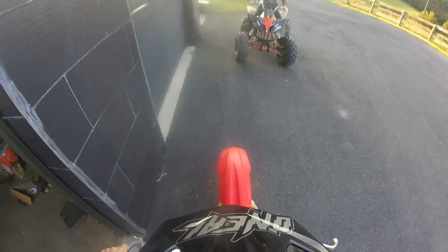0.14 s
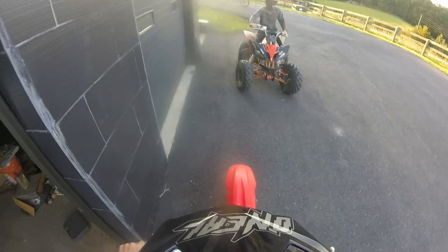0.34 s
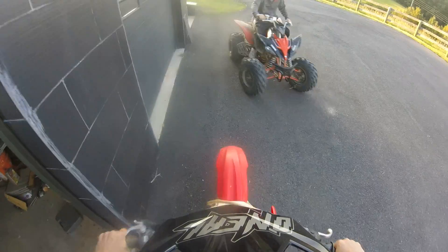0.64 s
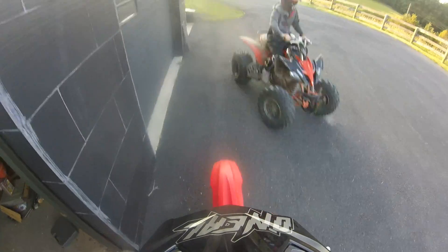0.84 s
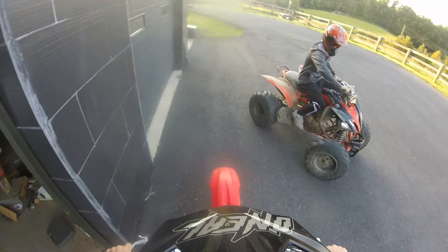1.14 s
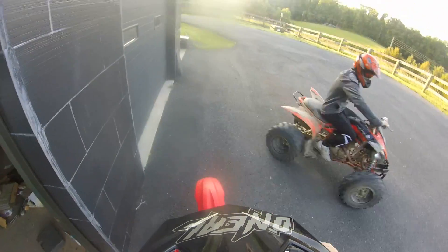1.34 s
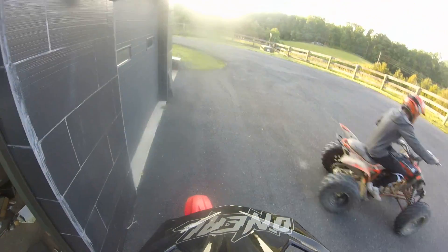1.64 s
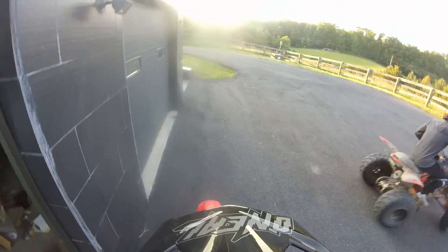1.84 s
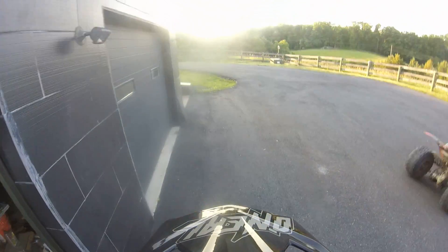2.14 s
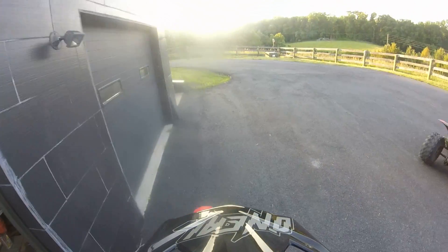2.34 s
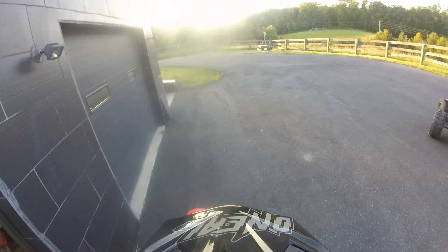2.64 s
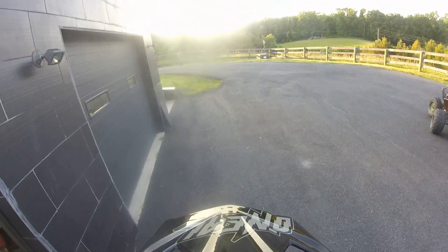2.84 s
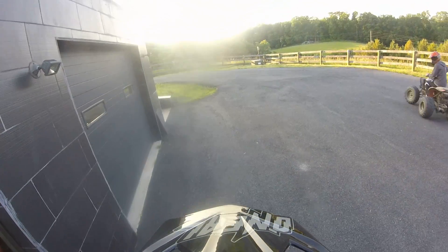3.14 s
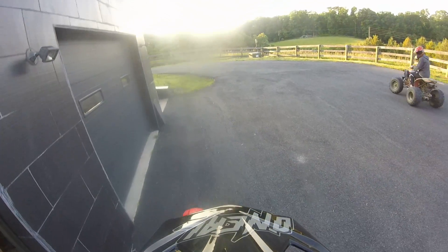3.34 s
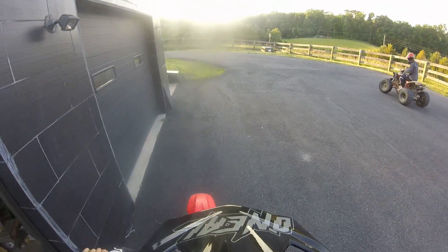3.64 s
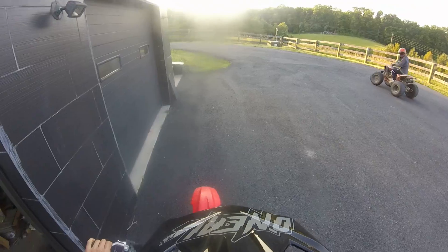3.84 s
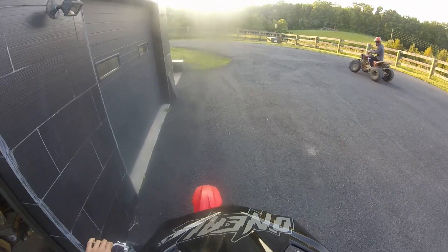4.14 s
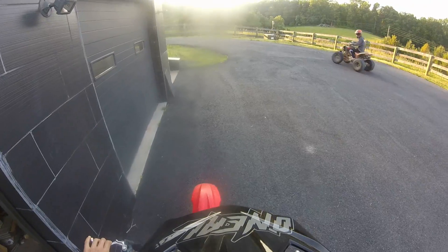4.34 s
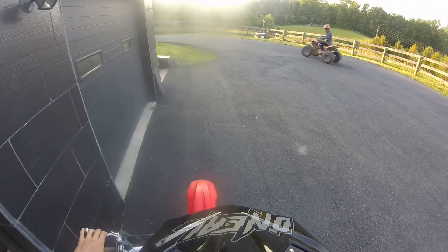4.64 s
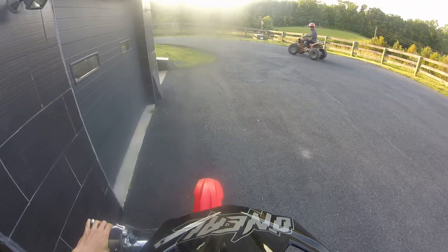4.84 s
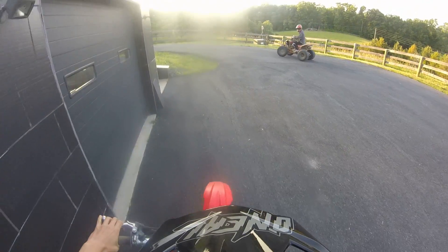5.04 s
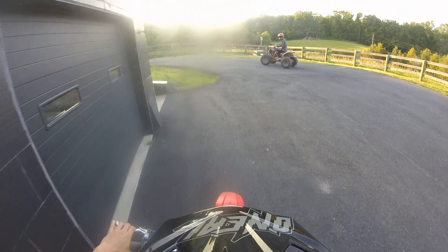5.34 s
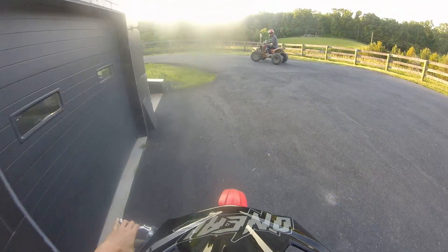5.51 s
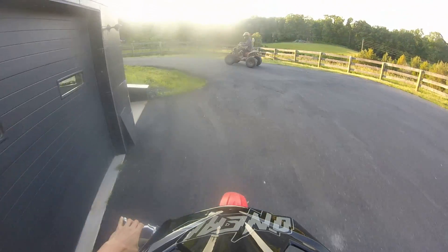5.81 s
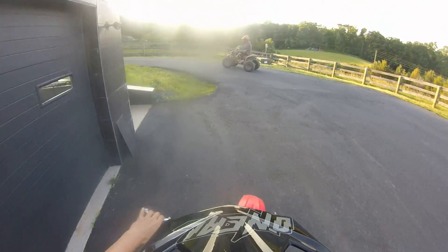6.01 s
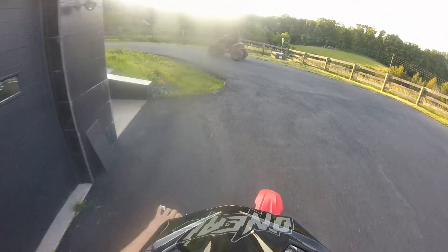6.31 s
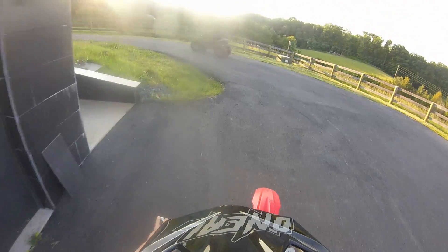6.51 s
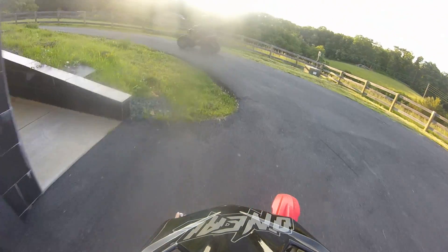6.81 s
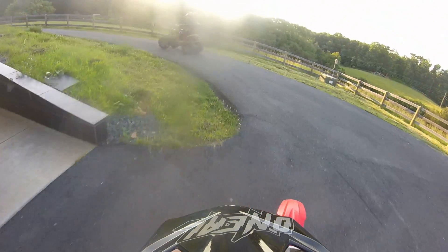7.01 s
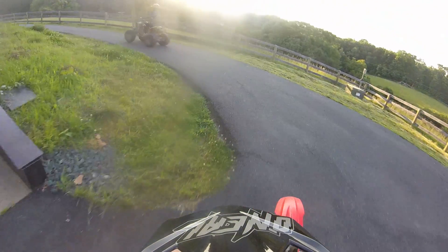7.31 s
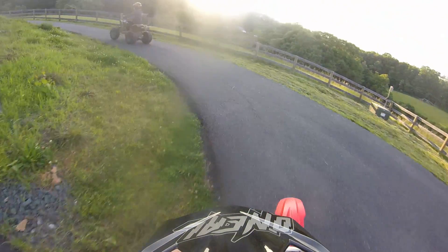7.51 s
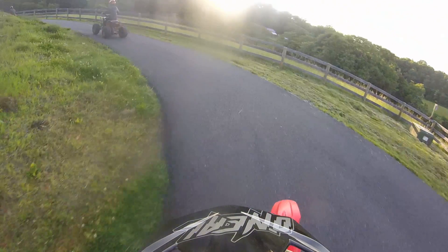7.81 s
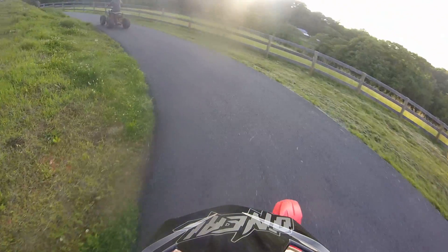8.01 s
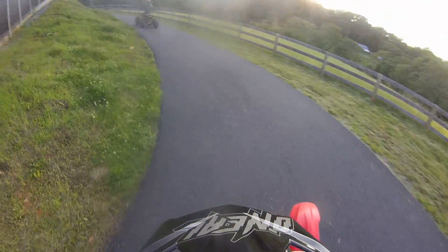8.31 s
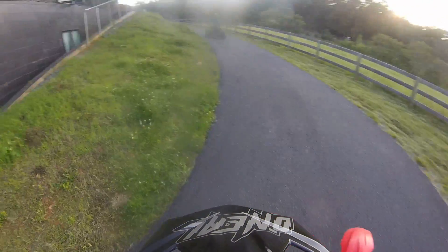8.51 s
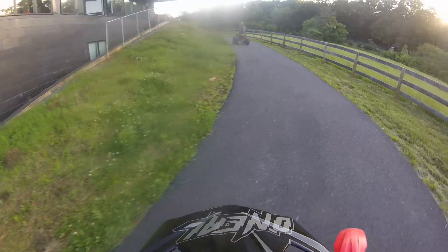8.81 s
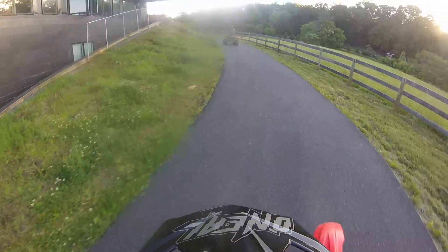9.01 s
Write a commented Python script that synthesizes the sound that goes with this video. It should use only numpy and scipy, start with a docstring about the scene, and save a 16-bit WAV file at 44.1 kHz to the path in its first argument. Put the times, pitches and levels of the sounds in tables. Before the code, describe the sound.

A muffled quad putters past while a dirt bike's kick lever clanks close by. The single-cylinder engine catches and gets two double blips of throttle, with a few sharp pops. The bike then pulls away along a paved lane, thudding and clattering, echoing slightly off a garage wall. Near the end the chain ticks as the throttle closes and gently reopens. Heard from the rider's helmet, with a low wind rumble.

```python
"""First a quad putters past while a single-cylinder dirt bike is kick-started beside a garage wall. At 1 s the
engine catches, and the rider gives two double blips of throttle. Each firing thuds in the pipe and honks in the
air intake; valve and piston blows ring a camera case on the helmet. From 3.3 s the bike pulls away along a
paved lane in a low wind, its piston slapping at low speed. Near the end the chain ticks, and the rider rolls
off the throttle and picks up again."""
import sys
import numpy as np
from scipy import signal
from scipy.io import wavfile

SR = 44100
rng = np.random.default_rng(int(sys.argv[2]) if len(sys.argv) > 2 else 0)


def generate_wav(signal):
    """Clip the signal to [-1, 1] and save it as 16-bit WAV at the path in sys.argv[1]."""
    frames = np.transpose(np.atleast_2d(signal))
    scaled = np.clip(frames, -1, 1) * 32767
    pcm = np.round(scaled).astype(np.int16)
    wavfile.write(sys.argv[1], SR, pcm)


N = 403956
TIME = np.arange(N) / SR
BINS = np.fft.rfftfreq(8192, 1 / SR)  # the frequencies (Hz) at which filter gains are given

# air buffeting the helmet: t/s, level/dB
WIND_LEVELS = [(0, -58.5), (3, -43), (5, -38), (7, -44), (9.16, -43.5)]
# the tone of that wind: f/Hz, level/dB
WIND_TONE = [(8, 2.5), (20, -9.5), (60, -35), (150, -16.5), (400, -16), (1000, -23.5), (4000, -66)]
# the quad's engine speed: t/s, firing rate/Hz
QUAD_SPEED = [(0, 51), (.15, 37), (.3, 51), (.5, 44.6), (.62, 46), (.75, 53.5), (.9, 50), (1.6, 58),
              (2, 44.5), (3.3, 46.7)]
# the quad's loudness: t/s, exhaust level/dB, machine noise level/dB
QUAD_LEVELS = [(0, -51, -45.5), (.2, -40.5, -44), (.5, -45.5, -43.5), (.68, -40, -42.5), (.85, -40.5, -43),
               (1.2, -43, -35), (1.7, -35.5, -38.5), (2.1, -59, -40), (3.3, -50.5, -44), (9.16, -78, -46)]
# the tone of its machine noise, before a bass cut: f/Hz, level/dB
QUAD_TONE = [(35, -42), (60, 4.5), (110, -1.5), (150, -19), (339, -26), (480, -45.5), (982, -41),
             (1490, -24.5), (2060, -48), (2420, -30), (2910, -31), (4510, -48.5), (4950, -53.5),
             (8230, -51.5), (15000, -76)]
# its squeaks on dabs of throttle: t/s, length/s, f/Hz, level/dB
QUAD_SQUEAKS = [(.23, .06, 4500, -59), (.665, .06, 4600, -56)]
# kick lever and footwork: t/s, peak level/dB, time to fade by 60 dB/s, treble tilt/(dB per octave)
KICKS = [(0.081, -37, 0.065, -1), (.241, -26.5, 0.13, -3), (0.314, -32, 0.074, -4),
         (.333, -19.5, 0.13, -0.5), (0.456, -29, 0.13, 0.5), (0.883, -33, 0.051, -2),
         (.907, -23.5, 0.049, -6.5), (.991, -16.5, 0.088, -2.5), (2.963, -25.5, 0.26, 2.5)]
# the tone of those metal knocks: f/Hz, level/dB
KICK_TONE = [(180, -67), (300, -11), (577, -15.5), (1010, -14), (1210, -7), (1590, 0.5), (2040, -14.5),
             (3020, 6), (3330, -10), (3860, -7), (4470, -36), (6000, -10.5), (6950, -23.5), (10600, -23),
             (15000, -51)]
# sharp pops as the fuel mixture catches: t/s, peak level/dB
FUEL_POPS = [(1.314, -23), (1.321, -10), (2.44, -14), (2.445, -12.5), (2.662, -14), (2.68, -11.5),
             (2.695, -11)]
# the helmet jolts with the kicks: t/s, level/dB, f/Hz, length/s
HELMET_JOLTS = [(0.271, -27.5, 16.3, 0.047), (0.368, -25.5, 16.2, 0.072), (0.479, -34, 13.4, 0.13),
                (0.92, -23, 19.6, 0.0632)]
# the chain ticks on its guide: t/s, tick rate/Hz, level/dB
CHAIN_TICKS = [(6.7, 39, -70), (7.05, 27, -52.5), (7.45, 37.5, -50.5), (7.92, 45, -57), (8.01, 54, -50.5),
               (8.1, 46, -64), (8.3, 45, -57.5), (8.6, 50, -89)]
# the garage wall throws the engine back: t/s, echo level/dB
WALL_ECHO = [(1, -5.5), (3, -9), (4.7, -7.5), (5.65, -3.5), (6.5, -6), (7.3, -9)]

# Modes are the pitches at which a part likes to ring. All of these list: f/Hz, width/Hz, level/dB
CHAIN_MODES = [(3880, 420, 13), (6060, 840, 2), (6960, 600, 1), (8370, 810, 1.5), (10013, 1420, -10),
               (11544, 1000, -10), (14610, 1600, -19.5)]
CASE_HIGH_MODES = [(2419, 128, 6), (2698, 48, 12.5), (2758, 160, 2.5), (2977, 340, 1), (2980, 230, -8.5),
                   (3816, 230, -10.5)]  # the camera case's higher, narrower notes
CASE_MODES = [(1380.4, 146, 14), (1529, 205, 14.5), (1893, 210, 0.5), (1170, 1200, -7.5)]  # the camera case
SLAP_MODES = [(1561, 137, -0.5), (1456, 120, 1)]  # the engine, struck by its piston
AIRBOX_MODES = [(229.2, 40, -5), (303, 50, -6.5), (164, 110, -22.5)]  # the box the engine breathes through
BOOM_MODES = [(52.6, 20, 0), (91.2, 30, 6), (133.4, 39, 0)]  # the pipe's deepest notes; each is rescaled, so its level here cancels
PULL_BODY_MODES = [(194, 22, 14.5), (228, 42, 4.5), (290, 64, 13), (375.5, 96, -27)]  # the pipe's middle notes under load
PULL_BARK_MODES = [(485.5, 100, 4), (689, 128, 1.5), (872, 76, -3)]  # its upper notes under load, at 50 firings a second
COAST_BODY_MODES = [(182, 23, 13), (221, 106, 8), (256, 66, -20), (359, 67, -3)]  # its middle notes when coasting
COAST_BARK_MODES = [(450, 210, 8.5), (611, 160, 0.5), (698, 230, 2.5), (900, 130, -5.5)]  # its upper notes when coasting

# the tone of the engine's rasp and of its higher sizzle: f/Hz, level/dB
RASP_TONE = [(1180, -19), (2000, -2), (2050, -8), (2210, 2), (2660, 6), (2880, -1.5), (3080, -5.5),
             (3570, -5.5), (3870, -10), (4530, -25.5), (5000, -33.5), (6500, -46), (11000, -120)]
SIZZLE_TONE = [(2820, -51), (4800, -9), (5260, -11.5), (5730, -2), (6020, 0), (6590, -8.5), (7260, -12.5),
               (8420, -12), (9400, -18), (11500, -24.5), (12900, -30), (14100, -31), (15100, -36)]
# valve and piston blows: delay after firing/cycles, coasting level/dB, loaded level/dB
VALVE_BLOWS = [(.06, -1.5, -6), (.33, -8, -10), (.64, -3.5, -8.5), (0.801, -3, -3.5)]
# throttle blips in neutral: t/s, held/s, top firing rate/Hz, extra exhaust/dB, extra clatter/dB,
# extra rasp/dB, share of intake honk/(0-1)
THROTTLE_BLIPS = [(.985, 0.093, 52.5, 12.5, 5, 8, 0.72), (1.215, 0.094, 69.5, 14, 12.5, 5.5, 0.57),
                  (2.335, .125, 42, 11, 4, 6.5, 0.7), (2.61, 0.089, 69, 13, 6, 4, 1)]
# misfires dip the exhaust: t/s, length/s, level change/dB
MISFIRE_DIPS = [(1.193, 0.015, -4), (2.296, 0.045, -20), (3.688, 0.017, -15), (3.875, 0.023, -18),
                (4.938, 0.014, -7)]
# the bike's engine speed in gear: t/s, firing rate/Hz
RIDE_SPEED = [(3.3, 37.69), (3.4, 35.4), (3.56, 43.5), (4.0, 43.93), (4.13, 48.82), (4.25, 50.79),
              (4.79, 46.64), (4.93, 47.83), (5.49, 47.13), (6.1, 56.82), (6.18, 54.8), (6.5, 55.53),
              (6.92, 51.47), (7.31, 52.89), (7.79, 48.67), (7.85, 45.94), (8.21, 39.38), (8.31, 42.46),
              (8.46, 41.0), (8.6, 44.1), (8.7, 37.16), (8.76, 38.96), (9.04, 40.67), (9.16, 38.74)]
# the throttle in gear: t/s, opening/(0-1)
RIDE_THROTTLE = [(3.3, 0), (3.45, 0.34), (3.95, 0.36), (4.25, .82), (5.5, 1), (5.8, 0.96), (7.76, 0.65),
                 (7.82, 0), (8.12, 0), (8.33, 0), (8.47, 0.22), (9.16, 0.24)]

# A law sets a sound's level: dB at cruising speed, dB per octave of speed,
# extra dB when firing evenly, extra dB at full load.
EXHAUST_LAW, BARK_LAW = (-36, 3.5, 4.5, 0), (-8, 4.5, -1, 4)  # bark is relative to exhaust
RASP_LAW, SIZZLE_LAW = (-40, 14.5, 0.5, -0.5), (-15.5, 6, 0, -0.5)  # sizzle is relative to rasp
CLATTER_LAW = (-35.5, 10.5, 1, 0.5)
BOOM_LAW, DRONE_LAW, HUM_LAW = (-43.5, 6, -5, 12), (-41.5, -0.5, -1.5, 3.5), (-43, 16, -8, -9)

IDLE_HZ, CRUISE_HZ = 27.95, 49.77  # firings per second
BOOM_HZ, HOLLOW_HZ, SLAP_GONE_HZ = 55.4, 55.1, 48.7  # firing rates: boom peaks, drone dips, slap stops
CATCH_S, CLUTCH_S = 1, 3.306  # the engine catches; the clutch bites
EVEN_OPENING, LOAD_OPENINGS = 0.257, (0.27, 0.8)  # throttle: even firing from here; load builds here


def amp(db):
    """Turns decibels into a gain."""
    return 10 ** (np.asarray(db) / 20)


def evened(x):
    """Scales a signal so its average strength (rms) is 1."""
    return x / np.sqrt(np.mean(x ** 2) + 1e-20)


def steadied(x, size=6615):
    """Holds the strength near 1 over a moving window of `size` samples."""
    window = np.hanning(size)
    power = signal.fftconvolve(x ** 2, window, "same") / signal.fftconvolve(np.ones(N), window, "same")
    return x / np.sqrt(abs(power) + 1e-4 * np.mean(x ** 2))


def curves(rows):
    """Joins timed rows by straight lines, giving one curve per column."""
    rows = np.array(rows, float)
    times, *columns = rows[np.argsort(rows[:, 0])].T
    return [np.interp(TIME, times, column) for column in columns]


def tone(points):
    """Filter gains drawn through (Hz, dB) points."""
    hz, db = np.transpose(points)
    return amp(np.interp(np.log(BINS + 1), np.log(hz + 1), db))


def peaks(modes):
    """Filter gains with a steep peak for each (Hz, width Hz, dB) mode."""
    return np.sqrt(sum((amp(db) / (1 + (2 * (BINS - hz) / width) ** 2)) ** 2 for hz, width, db in modes))


def ring(x, gain):
    """Filters a signal so that the ringing comes after each hit, never before."""
    log_gain = np.log(np.maximum(gain, 1e-5 * gain.max()))
    mirrored = np.r_[log_gain, log_gain[-2:0:-1]]
    taps = np.fft.ifft(np.exp(np.conj(signal.hilbert(mirrored)))).real
    return signal.oaconvolve(x, taps[:len(BINS)])[:len(x)]


def sliding_ring(x, factor, gain):
    """Moves all of a filter's pitches by a factor, by running it on a stretched clock."""
    clock = np.cumsum(factor)
    ticks = np.arange(int(clock[-1]) + 1)
    return np.interp(clock, ticks, ring(np.interp(ticks, clock, x), gain))


def add(mix, s, sound):
    """Mixes a sound in, starting at s seconds."""
    part = mix[max(round(s * SR), 0):][:len(sound)]
    part += sound[:len(part)]


def swell(s, length):
    """A smooth rise and fall that peaks at s seconds."""
    return np.exp(-((TIME - s) / length) ** 2)


def flicker(rate_hz):
    """A randomly wandering curve of strength 1."""
    knots = np.arange(0, TIME[-1] + 1, 1 / rate_hz)
    return evened(np.interp(TIME, knots, rng.standard_normal(len(knots))))


def strokes(cycles, spread_db, jitter_ms):
    """One click a cycle, each a little different in size and timing."""
    at = np.interp(np.arange(np.ceil(cycles[0]), cycles[-1]), cycles, np.arange(N))
    size, late = rng.standard_normal((len(at), 2)).T
    here = at.astype(int)
    size = amp(np.clip(size, -2, 2) * (spread_db * np.ones(N))[here])
    at = np.clip(at + late * (jitter_ms * np.ones(N))[here] * SR / 1000, 0, N - 2)
    whole = at.astype(int)
    return np.bincount(whole, size * (1 - at % 1), N) + np.bincount(whole + 1, size * (at % 1), N)


def puffs(clicks, decay_ms, floor):
    """Rushing noise that flares at every click, above a steady floor."""
    flare = signal.lfilter([1], [1, -np.exp(-1000 / (decay_ms * SR))], clicks)
    return evened((evened(flare) + floor) * rng.standard_normal(N))


def wind():
    """Air rumbles round the helmet."""
    return amp(curves(WIND_LEVELS)[0]) * evened(ring(rng.standard_normal(N), tone(WIND_TONE)))


def quad():
    """A muffled quad passes; its intake honks and it squeaks in time with its firings."""
    cycles = np.cumsum(curves(QUAD_SPEED)[0]) / SR
    note_db, noise_db = curves(QUAD_LEVELS)
    fire = evened(strokes(cycles, spread_db=2.5, jitter_ms=0.51))
    note = steadied(ring(fire, peaks([(97, 62, 0)])))
    bass_cut = BINS ** 2 / (BINS ** 2 + 220 ** 2)
    noise = evened(ring(puffs(fire, decay_ms=7, floor=4.7), tone(QUAD_TONE) * bass_cut))
    squeak = puffs(fire, decay_ms=8.4, floor=.05)
    honk = amp(7.6) * evened(ring(puffs(fire, decay_ms=9, floor=1.5), peaks([(330, 62, 0)])))
    dabs = sum(amp(db) * swell(s, length) * (honk + evened(ring(squeak, peaks([(hz, 250, 0)]))))
               for s, length, hz, db in QUAD_SQUEAKS)
    rasp = evened(ring(puffs(fire, decay_ms=9, floor=1.59), peaks([(3050, 550, 2), (2300, 540, -5.5)])))
    passing = amp(-39.5) * swell(1.5, 0.34)  # the engine's open side goes by
    return amp(note_db) * note + amp(noise_db) * noise + dabs + passing * rasp


def wall(sound, scatter_hz=480):
    """The wall and paving scatter echoes from 8 ms on, mostly above scatter_hz."""
    t = TIME[:SR // 8]
    taps = rng.standard_normal(len(t)) * (rng.random(len(t)) < 1500 / SR)
    taps = taps * (t > .008) * np.exp(-t / 0.017)
    echoes = signal.oaconvolve(sound, taps / np.linalg.norm(taps))[:N]
    return ring(echoes, BINS ** 2 / (BINS ** 2 + scatter_hz ** 2))


def chain():
    """The chain ticks on its guide, and its links ring brightly."""
    tick_hz, db = curves(CHAIN_TICKS)
    ticks = strokes(np.cumsum(tick_hz) / SR, spread_db=2, jitter_ms=.4)
    chatter = puffs(ticks, decay_ms=4, floor=.35)
    return amp(db) * evened(ring(chatter, peaks(CHAIN_MODES)))


def kicks():
    """The rider's foot rattles the metal levers, and the kicks jolt the helmet."""
    out, t = np.zeros(N), TIME[:SR // 4]
    for s, db, fade_s, tilt_db in KICKS:
        burst = rng.standard_normal(len(t)) * amp(-60 * t / fade_s) * (1 - np.exp(-t / 0.0026))
        rattle = ring(burst, tone(KICK_TONE) * amp(tilt_db * np.log2(1 + BINS / 3000)))
        add(out, s, amp(db) * rattle / abs(rattle).max())
    for s, db, hz, length in HELMET_JOLTS:
        out += amp(db) * swell(s, length) * np.sin(2 * np.pi * hz * (TIME - s))
    return out


def pops():
    """The fuel mixture catches with short, hard bangs."""
    out, t = np.zeros(N), TIME[:SR // 4]
    for s, db in FUEL_POPS:
        burst = rng.standard_normal(len(t)) * np.exp(-t / 0.0041)
        pop = ring(burst, peaks([(1381, 180, 12.5), (2580, 1200, -9.5), (393, 2500, -3)]))
        add(out, s, amp(db) * pop / abs(pop).max())
    return out


def intake_moan(cycles):
    """Gulps of air ring the airbox as the throttle rolls wide open."""
    gulps = strokes(cycles, spread_db=1, jitter_ms=.03)
    return amp(-40) * swell(5.85, 0.24) * steadied(ring(gulps, peaks([(379, 43, 0)])))


def piston_slap(cycles, labour):
    """The piston knocks just before each firing while the engine labours at low speed."""
    blows = evened(strokes(cycles - .86, spread_db=2.5, jitter_ms=0.19))
    knocks = blows + 0.37 * puffs(blows, decay_ms=3.6, floor=.05)
    return amp(-34.5) * labour * evened(ring(knocks, peaks(SLAP_MODES)))


def valve_clatter(cycles, load, clatter_db, rasp_db, sizzle_db):
    """Valve and piston blows ring the camera case in its low and high notes, and throw off a rasp and a sizzle."""
    blows = evened(sum(amp(light_db + load * (heavy_db - light_db))
                       * strokes(cycles - delay, spread_db=1.5, jitter_ms=0.12)
                       for delay, light_db, heavy_db in VALVE_BLOWS))
    rattle = blows + .85 * puffs(blows, decay_ms=3.5, floor=.3)
    clatter = steadied(ring(rattle, peaks(CASE_MODES)), size=3500)
    scrape = puffs(blows, decay_ms=8.5, floor=1.8)
    case_high = evened(ring(blows + scrape, peaks(CASE_HIGH_MODES)))
    rasp = steadied(evened(ring(.4 * blows + scrape, tone(RASP_TONE))) + .8 * case_high)
    sizzle = steadied(ring(0.18 * blows + puffs(blows, decay_ms=6.2, floor=0.82), tone(SIZZLE_TONE)))
    clatter = amp(clatter_db + 1.1 * flicker(rate_hz=25)) * clatter
    return clatter + amp(rasp_db) * (rasp + amp(sizzle_db) * sizzle)


def silencer(pulses, delay_s):
    """The silencer sends two reflections after each pulse."""
    first = np.interp(TIME - delay_s, TIME, pulses)
    second = np.interp(TIME - 1.9 * delay_s, TIME, pulses)
    return 0.5 * pulses + first + 0.35 * second


def exhaust(cycles, load, stumble, honk_share, exhaust_db, bark_db, booms_db):
    """Each firing rings the pipe and airbox: evenly under load, stumbling on a shut throttle."""
    fire = evened(strokes(cycles, spread_db=.5 + 2.5 * stumble, jitter_ms=.05 + .4 * stumble))
    gas = puffs(fire, decay_ms=6, floor=.15)
    burble = stumble * puffs(fire, decay_ms=8, floor=3)
    heat = (np.gradient(cycles) * SR / 50) ** 0.5  # harder running heats the gas and raises the bark

    def pipe(drive, pull_modes, coast_modes, pitch_factor):
        """Blends the pipe's ring under load with its ring when coasting."""
        pulling = evened(sliding_ring(drive, pitch_factor, peaks(pull_modes)))
        coasting = evened(ring(drive, peaks(coast_modes)))
        return steadied(load * pulling + (1 - load) * coasting)

    body = pipe(fire + .1 * gas + .6 * burble, PULL_BODY_MODES, COAST_BODY_MODES, np.ones(N))
    pulses = stumble * fire + (1 - stumble) * silencer(fire, .0041 / heat)
    bark = pipe(pulses + .22 * gas + 1.8 * burble, PULL_BARK_MODES, COAST_BARK_MODES, heat)
    thuds = fire + .05 * gas + .1 * burble
    boom = sum(amp(db) * steadied(ring(thuds, peaks([mode]))) for db, mode in zip(booms_db, BOOM_MODES))
    inrush = puffs(fire, decay_ms=10, floor=2)  # keeps the airbox humming between firings
    honk = steadied(ring(.9 * fire + inrush, peaks(AIRBOX_MODES)), size=1100)
    note = steadied((1 - honk_share) * body + honk_share * honk, size=3500)
    return -amp(exhaust_db) * (note + amp(bark_db) * bark) - boom


def throttle_twist(s, length, attack_s=0.033, release_s=0.047):
    """One twist of the throttle, 0-1: open, hold, let go."""
    return np.clip((TIME - s) / attack_s, 0, 1) * np.clip(1 - (TIME - s - length) / release_s, 0, 1)


def engine_speed(run_on_s=.028, coast_s=.46):
    """Firings per second: blips spin the engine up and it coasts down, until the clutch bites."""
    speed = np.full(N, IDLE_HZ)
    for s, length, top, *_ in THROTTLE_BLIPS:
        start, climb_s = np.interp(s, TIME, speed), length + run_on_s
        climb = start + (top - start) * (TIME - s) / climb_s
        coast = IDLE_HZ + (top - IDLE_HZ) * np.exp((s + climb_s - TIME) / coast_s)
        speed = np.where(TIME < s, speed, np.minimum(climb, coast))
    return np.where(TIME < RIDE_SPEED[0][0], speed, curves(RIDE_SPEED)[0])


def bike():
    """The engine catches on the kick; speed and throttle steer its sounds, and the wall echoes them."""
    speed, throttle, echo_db = engine_speed(), curves(RIDE_THROTTLE)[0], curves(WALL_ECHO)[0]
    cycles = np.cumsum(speed) / SR
    cycles -= np.interp(CLUTCH_S, TIME, cycles)  # the clutch bites on a firing
    octaves = np.log2(speed / CRUISE_HZ)
    pull, load = np.clip(throttle / EVEN_OPENING, 0, 1), np.interp(throttle, LOAD_OPENINGS, [0, 1])
    labour = np.clip(throttle / .36, 0, 1) ** 1.4 * np.clip((SLAP_GONE_HZ - speed) / 4, 0, 1)

    def level(law):
        """Level in dB from speed, even firing and load."""
        db, per_octave_db, pull_db, load_db = law
        return db + per_octave_db * octaves + pull_db * pull + load_db * load

    exhaust_db, bark_db = level(EXHAUST_LAW), level(BARK_LAW)
    clatter_db, rasp_db = level(CLATTER_LAW), level(RASP_LAW)
    honk_share = np.zeros(N)
    for s, length, _, more_exhaust_db, more_clatter_db, more_rasp_db, honk in THROTTLE_BLIPS:
        twist = throttle_twist(s, length)
        exhaust_db += more_exhaust_db * twist
        bark_db -= 3 * twist
        clatter_db += more_clatter_db * swell(s + length, 0.063)
        rasp_db += more_rasp_db * twist
        honk_share += honk * (TIME > s) * np.exp(-np.maximum(TIME - s - length, 0) / 0.14)
    exhaust_db += sum(db * swell(s, length) for s, length, db in MISFIRE_DIPS)
    exhaust_db += 7 * (1 - pull) * np.maximum(octaves, 0)  # louder at speed on a shut throttle
    clatter_db -= 1.5 * labour  # makes room for the piston slap
    echo_swing_db = echo_db - echo_db.mean()  # the wall returns treble best
    rasp_db += 0.56 * echo_swing_db
    sizzle_db = level(SIZZLE_LAW) + 0.22 * echo_swing_db
    boom_db = level(BOOM_LAW) - 33 * abs(np.log2(speed / BOOM_HZ)) * (0.52 + .6 * load)
    drone_db = level(DRONE_LAW) - 9.5 * load * np.exp(-((speed - HOLLOW_HZ) / 2.1) ** 2)
    booms_db = [boom_db, drone_db, level(HUM_LAW)]  # the pipe's three deepest notes

    spin = np.clip(0.4 * np.log2(speed / IDLE_HZ) - .15, 0, 1) * (1 - pull)  # load from speed alone
    strain = np.clip(load + spin, 0, 1)
    stumble = (1 - pull) * (1 - .8 * spin)
    stumble *= 1 - 0.25 * (TIME > CLUTCH_S)  # the rolling wheel steadies the engine
    engine = exhaust(cycles, strain, stumble, np.clip(honk_share, 0, 1), exhaust_db, bark_db, booms_db)
    engine += valve_clatter(cycles, strain, clatter_db, rasp_db, sizzle_db)
    engine += piston_slap(cycles, labour) + intake_moan(cycles)
    engine *= np.clip((TIME - CATCH_S) / .012, 0, 1)  # silent until it catches
    echo = amp(echo_db)
    return (engine + echo * wall(engine)) / np.sqrt(1 + echo ** 2)


def scene():
    """Adds all the sources into one channel."""
    return (bike() + chain() + quad() + kicks() + pops() + wind())[None]


def record(dry):
    """Cuts the treble above 15250 Hz."""
    low_pass = signal.firwin(511, 15250, window=("kaiser", 9), fs=SR)
    return signal.oaconvolve(dry, low_pass[None], "same")


dry = scene()
out = record(dry)
generate_wav(out)
```